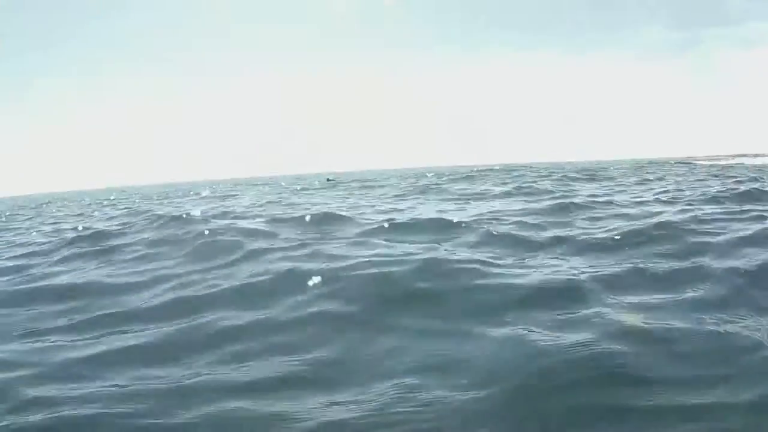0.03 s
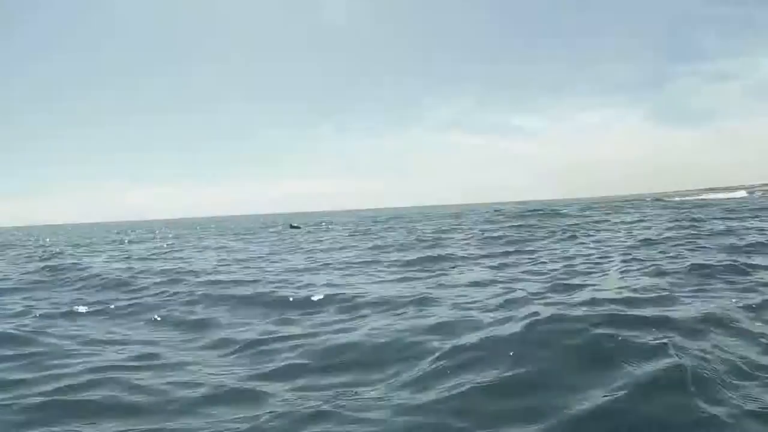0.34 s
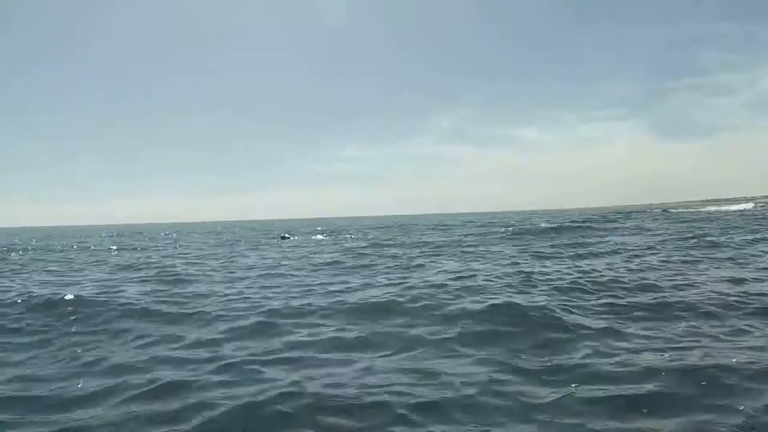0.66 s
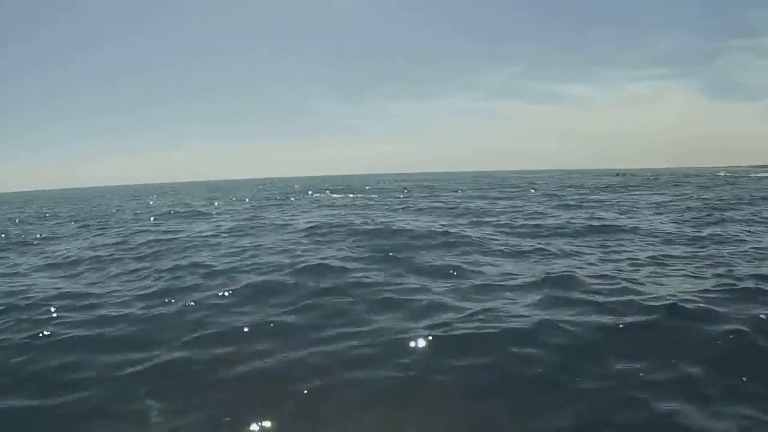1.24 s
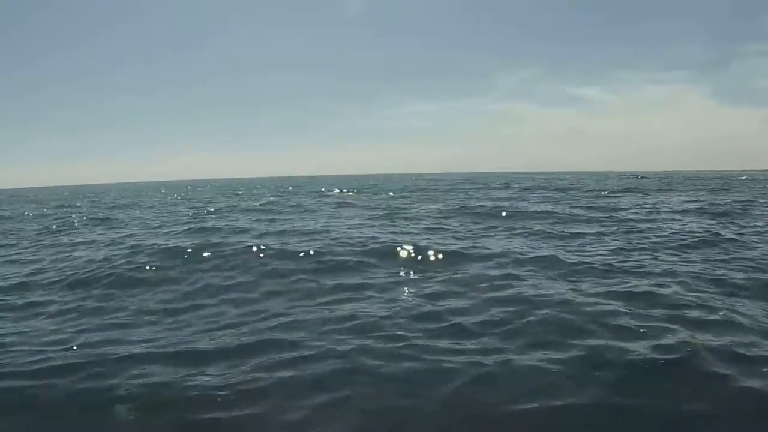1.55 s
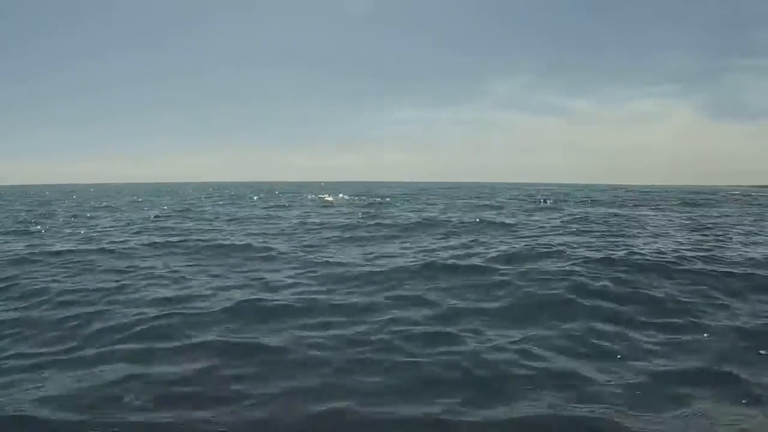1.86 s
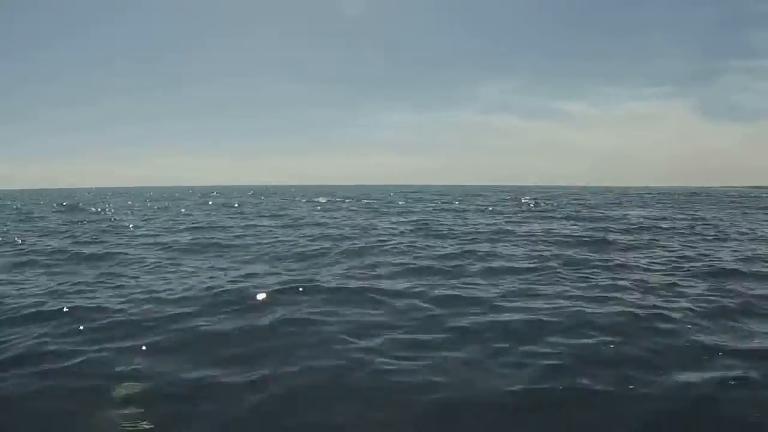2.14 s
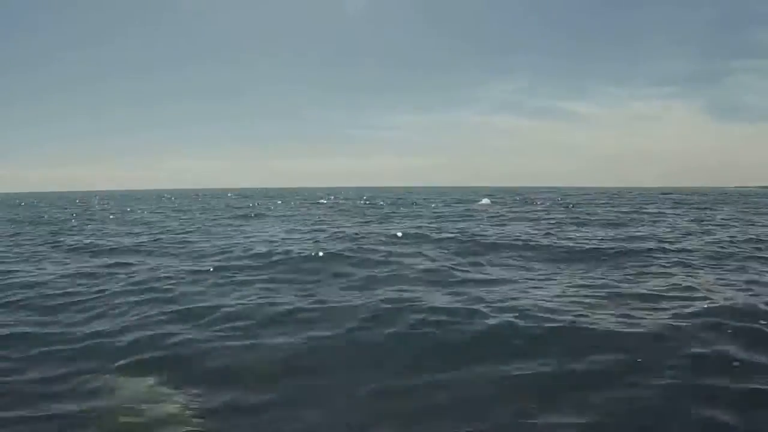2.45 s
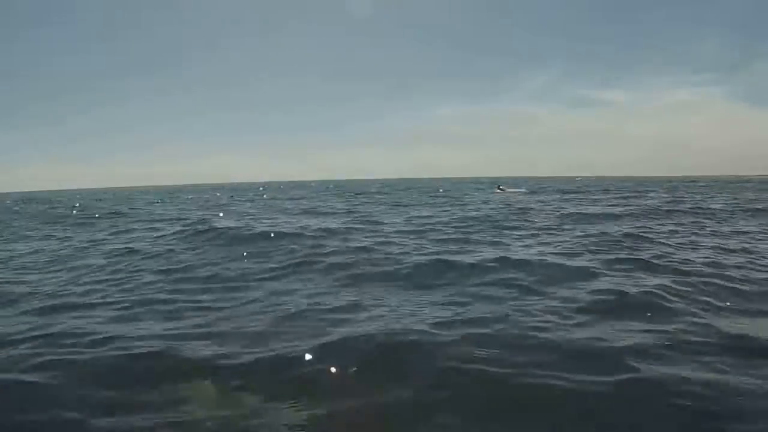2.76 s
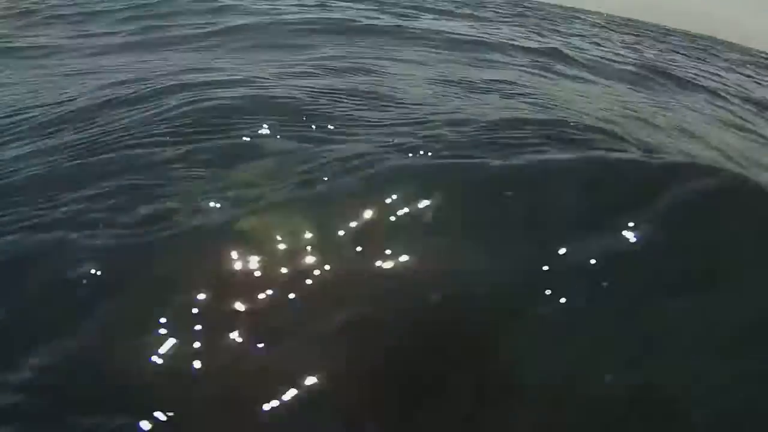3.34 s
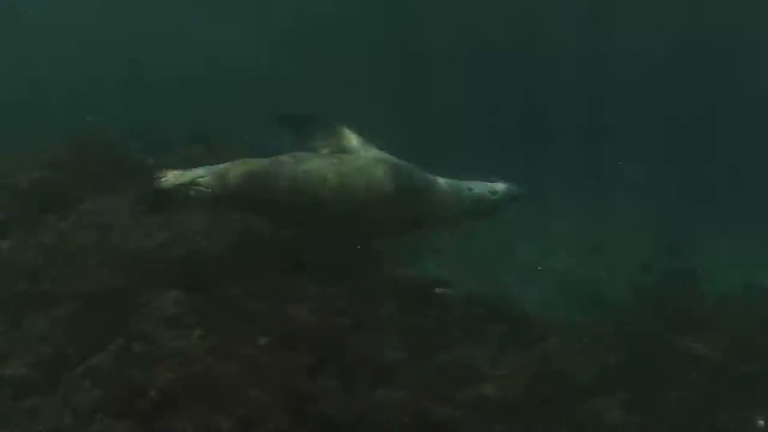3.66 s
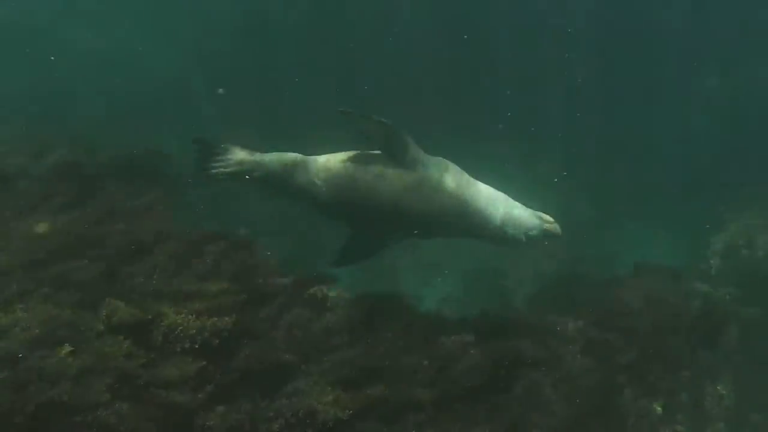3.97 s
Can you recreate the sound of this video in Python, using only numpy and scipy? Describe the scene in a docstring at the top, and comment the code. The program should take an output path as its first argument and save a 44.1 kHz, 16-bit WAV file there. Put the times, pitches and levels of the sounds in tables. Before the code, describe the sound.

Sea water laps and drips close by, then splashes and gurgles as the microphone goes under.

```python
"""A floating case dips under the sea

Wavelets knock a watertight case while droplets and small bubbles plink nearby. From about 3.1 s it
dips under: water slaps the wall and trapped air rings loudly beside it. Each bubble is a damped
oscillator, with the air as its spring and the surrounding water as its mass. Once the case is
submerged, a dull gurgle and a faint fizz remain over the low sway of the water."""
import sys
import numpy as np
from scipy import signal
from scipy.fft import rfft, irfft, next_fast_len
from scipy.io import wavfile
from scipy.ndimage import uniform_filter1d, minimum_filter1d

SR = 44100
rng = np.random.default_rng(int(sys.argv[2]) if len(sys.argv) > 2 else 0)


def persist_wave(psi):
    """Save psi, clipped to +-1, as 16-bit WAV."""
    counts = np.round(np.clip(psi, -1, 1) * 32767).astype(np.int16)
    wavfile.write(sys.argv[1], SR, np.atleast_2d(counts).T)


N = 176400
TIME_S = np.arange(N) / SR
RISE_CYCLES = 1.13  # a small bubble swells over this many cycles


def amp(db):
    """Amplitude ratio of a level in decibels."""
    return 10 ** (np.asarray(db) / 20)


def unit(x):
    """Normalisation to an RMS of one."""
    return x / np.sqrt(np.mean(x ** 2) + 1e-20)


def add(mix, start_s, sound):
    """Superposition: a sound sums into the mix from its start time."""
    part = mix[max(0, round(start_s * SR)):][:len(sound)]
    part += sound[:len(part)]


def level(points, column=1):
    """Gain envelope, interpolated in decibels between points in time."""
    curve = np.array(points)
    return amp(np.interp(TIME_S, curve[:, 0], curve[:, column]))


def decay(t, t60_s):
    """Exponential damping: the amplitude falls 60 dB in t60_s."""
    return np.exp(-np.log(1000) * t / t60_s)


def colour(x, spectrum, tilt_db_per_octave=0, tilt_band_hz=(1050, 9240)):
    """Minimum-phase filtering by a spectrum, tilted across one band."""
    size = next_fast_len(len(x) + 2048) * 2
    octave = np.log2(np.fft.rfftfreq(size, 1 / SR) + 1)
    hz, db = np.transpose(spectrum)
    low, high = np.log2(tilt_band_hz)
    tilt_db = tilt_db_per_octave * (np.clip(octave, low, high) - low)
    cepstrum = irfft(np.log(amp(np.interp(octave, np.log2(hz), db) + tilt_db)))
    cepstrum[1:size // 2] *= 2  # folding the cepstrum makes the filter causal
    cepstrum[size // 2 + 1:] = 0
    return irfft(rfft(x, size) * np.exp(rfft(cepstrum)))[:len(x)]


def drift(hz):
    """Random modulation: low-passed noise with an RMS of one."""
    lowpass = np.exp(-(np.fft.rfftfreq(N, 1 / SR) / hz) ** 2)
    return unit(irfft(rfft(rng.standard_normal(N)) * lowpass, N))


def ring(hz, rise_s, t60_s, glide_per_s=0, max_glide=.09):
    """Damped oscillation, whose pitch may climb by a fraction of up to max_glide."""
    t = np.arange(0, 1.3 * t60_s + 2 * rise_s, 1 / SR)
    envelope = (1 - np.exp(-(t / rise_s) ** 2)) * decay(t, t60_s)
    pitch_hz = hz * (1 + np.minimum(glide_per_s * t, max_glide))
    return envelope / envelope.max() * np.sin(2 * np.pi * np.cumsum(pitch_hz) / SR)


def swarm(per_s, low_hz, high_hz, min_cycles, spread_db, glide_per_s, count=40):
    """Incoherent sum of bubble resonances of many sizes: most are weak, a few stand out."""
    out = np.zeros(N)
    rings = [ring(hz, RISE_CYCLES / hz, min_cycles * rng.uniform(1.0, 2.5) / hz, glide_per_s, .3)
             for hz in np.geomspace(low_hz, high_hz, count)]
    for when, kind, chance, sign in rng.random((int(per_s * N / SR), 4)):
        gain = np.sign(sign - .5) * amp(spread_db * min(-np.log(chance), 3))
        add(out, when * N / SR, gain * rings[int(kind * count)])
    return unit(out)


# air pockets at the case: start_s, pitch_hz, level_db, rise_s, t60_s
TRAPPED_AIR = [(0.0, 1342, -30, 0.00017, 0.087), (0.008, 2470, -23.5, 0.00053, 0.025),
               (0.011, 1644, -32.5, 0.0007, 0.034), (0.043, 2060, -44, 0.00091, 0.08),
               (0.06, 1830, -34, 0.0015, 0.033), (0.0683, 1465, -25, 0.00016, 0.028),
               (0.0735, 1599, -15, 0.00064, 0.058), (0.0741, 2770, -29.5, 0.0005, 0.018),
               (0.151, 8860, -25.5, 0.00036, 0.0082), (0.681, 745, -50, 0.00024, 0.16),
               (1.9244, 1500, -45.5, 0.00027, 0.063), (3.1845, 2510, -5, 0.0011, 0.0025),
               (3.1856, 3860, -10.5, 0.0002, 0.014), (3.1851, 1442, -15, 0.00097, 0.027),
               (3.2703, 1800, -13.5, 0.0004, 0.013), (3.2733, 1945, 0, 0.0011, 0.0055),
               (3.288, 1630, -17.5, 0.0006, 0.043), (3.2876, 1122, -17.5, 0.0015, 0.046),
               (3.3005, 1960, -18.5, 0.0013, 0.024), (3.303, 1220, -15, 0.00077, 0.02),
               (3.3409, 1148, -10.5, 0.0034, 0.02), (3.3428, 1440, -12, 0.0004, 0.012),
               (3.361, 5500, -30, 0.0032, 0.0054), (3.379, 2920, -26, 0.00027, 0.036),
               (3.38, 1700, -23, 0.00028, 0.036), (3.4035, 2286, -16.5, 0.0015, 0.011),
               (3.4395, 2220, -16, 0.00084, 0.006), (3.4395, 9420, -16.5, 0.0006, 0.0047),
               (3.446, 1950, -10.5, 0.00033, 0.005), (3.453, 2320, -16, 0.0014, 0.0061),
               (3.4627, 1830, -10, 0.00031, 0.0013), (3.4705, 1550, -9.5, 0.00033, 0.013),
               (3.4707, 4400, -4.5, 0.00026, 0.0096), (3.4707, 2740, 2, 0.00017, 0.0065),
               (3.4805, 1050, -16.5, 0.00052, 0.0044), (3.502, 2240, -33, 0.0046, 0.028),
               (3.4982, 5740, -11.5, 0.00016, 0.0026), (3.507, 4840, -19, 0.00019, 0.0039),
               (3.5206, 1147, -31, 0.0012, 0.051), (3.5325, 1308, -21, 0.00069, 0.058),
               (3.5394, 1984, -3, 0.00041, 0.019), (3.5395, 6870, -15.5, 0.001, 0.0039),
               (3.5473, 3600, -7, 0.0034, 0.0084), (3.5478, 5450, -15, 0.00035, 0.0055),
               (3.5672, 1395, -14.5, 0.0017, 0.017), (3.5676, 6850, -12.5, 0.00017, 0.0031),
               (3.572, 1885, -17.5, 0.0028, 0.016), (3.585, 4700, -18, 0.00019, 0.008),
               (3.5895, 2690, -15, 0.0021, 0.013), (3.61, 1920, -29, 0.0027, 0.025),
               (3.637, 980, -13.5, 0.001, 0.015), (3.6443, 4390, -22, 0.0016, 0.0076),
               (3.6614, 882, -9.5, 0.00038, 0.045), (3.6642, 1940, -2.5, 0.0026, 0.0072),
               (3.684, 5550, -21, 0.0005, 0.0049), (3.701, 2780, -26, 0.00063, 0.014),
               (3.7154, 2210, -2.5, 0.00069, 0.0034), (3.716, 3830, -21, 0.00024, 0.01),
               (3.7433, 7260, -22, 0.0003, 0.0042), (3.7485, 1044, -30, 0.0008, 0.037),
               (3.9409, 716, -31.5, 0.0016, 0.015), (3.9764, 700, -26, 0.0034, 0.0025),
               (3.9813, 463, -28.5, 0.0024, 0.028)]

def close_bubbles(flutter_db=2.5, glide_per_s=2.8, max_glide=.09):
    """Minnaert resonance: trapped air rings, rising in pitch as it nears the surface."""
    out = np.zeros(N)
    for start_s, hz, db, rise_s, t60_s in TRAPPED_AIR:
        # start flat, to reach the listed pitch near the loudest part
        first_hz = hz / (1 + min(glide_per_s * (rise_s + t60_s / 10), max_glide))
        add(out, start_s, amp(db) * ring(first_hz, rise_s, t60_s, glide_per_s, max_glide))
    return out * amp(flutter_db * drift(hz=418))  # moving water shakes each ring


# water striking the case: start_s, level_db, tilt_db_per_octave, t60_s
WALL_IMPACTS = [(.007, -32.5, 3.5, 0.026), (0.0676, -34.5, 31, 0.0083), (0.073, -26.5, -5.5, 0.035),
                (0.151, -33, 1, 0.0041), (0.805, -41, 7, 0.018), (1.632, -34, 3.5, 0.011),
                (3.0172, -33, -8.5, 0.0069), (3.1198, -35.5, -10.5, 0.082), (3.134, -27.5, 19, 0.0097),
                (3.185, -14.5, 3, 0.019), (3.251, -38, 20, 0.009), (3.257, -28.5, 0.5, 0.029),
                (3.288, -16.5, -2.5, 0.023), (3.306, -26, 21, 0.011), (3.337, -27.5, 13, 0.013),
                (3.343, -18, -2.5, 0.032), (3.438, -17, 11, 0.015), (3.449, -14.5, -7, 0.028),
                (3.462, -19, -3, 0.0095), (3.4708, -7, -2.5, 0.011), (3.481, -26, 5, 0.011),
                (3.493, -23.5, 12.5, 0.0039), (3.498, -11.5, 3, 0.0042), (3.516, -26, 1, 0.0052),
                (3.522, -27, 11, 0.0046), (3.533, -5.5, 14.5, 0.0038), (3.537, -18, 9.5, 0.028),
                (3.553, -33.5, 19, 0.014), (3.567, -11, 9.5, 0.0042), (3.585, -13, -3.5, 0.022),
                (3.651, -38, 13, 0.0093), (3.664, -4, -9, 0.0064), (3.678, -14.5, 34, 0.0066),
                (3.683, -18, -1, 0.016), (3.709, -36, 22, 0.005), (3.7144, -10, -4, 0.0088),
                (3.725, -36, 8, 0.0093), (3.743, -26.5, 5.5, 0.0079), (3.775, -35.5, 16, 0.0073),
                (3.824, -40.5, 5.5, 0.013), (3.833, -40, 9.5, 0.028)]
# spectrum of impacts heard through the wall: frequency_hz, gain_db
WALL_SPECTRUM = [(100, -0.5), (500, -14), (1200, 5.5), (2200, 11), (3200, 1.5), (4100, 3.5), (4900, -9.5),
                 (5800, -2.5), (8000, -14), (10000, -18.5), (13000, -25), (16000, -39)]

def slaps(rise_s=0.0013, gain_db=-1):
    """Impact noise: each slap is a burst of tiny collisions, filtered by the case wall."""
    out, t = np.zeros(N), np.arange(2400) / SR
    for start_s, db, tilt, t60_s in WALL_IMPACTS:
        envelope = (1 - np.exp(-t / rise_s)) * decay(t, t60_s)
        burst = colour(envelope * rng.standard_normal(len(t)), WALL_SPECTRUM, tilt)
        burst *= np.linalg.norm(envelope / envelope.max()) / np.linalg.norm(burst)
        add(out, start_s, amp(db + gain_db) * burst / 2)
    return out


def case_resonance(x, t60_s=0.016, ring_db=-18.5):
    """Convolution with the plastic case's impulse response adds a short, dense ring."""
    t = np.arange(5000) / SR
    burst = rng.standard_normal(len(t)) * (1 - np.exp(-t / 0.0045)) * decay(t, t60_s)
    response = colour(burst, [(300, -5.0), (1200, 8.5), (3500, 10), (12000, -38)])
    return x + signal.fftconvolve(x, amp(ring_db) * response / np.linalg.norm(response))[:N]


# air churned in as the case sinks: time_s, level_db
CHURN_LEVEL = [(3.1, -83), (3.24, -55), (3.39, -41.5), (3.425, -54), (3.56, -38), (3.62, -46), (3.68, -36),
               (3.77, -68)]

def dive(spray_db=-12):
    """Air entrainment: water closing over the case makes churning bubbles and fine spray."""
    churn = swarm(per_s=420, low_hz=850, high_hz=3170, min_cycles=26, spread_db=2, glide_per_s=3.1)
    spray = swarm(per_s=1000, low_hz=3600, high_hz=15000, min_cycles=10, spread_db=6, glide_per_s=4)
    return level(CHURN_LEVEL) * (TIME_S > CHURN_LEVEL[0][0]) * (churn + amp(spray_db) * spray)


# wavelets meeting the case: start_s, level_db, pitch_hz
WAVELET_KNOCKS = [(0.066, -31, 167), (0.52, -34, 157), (0.706, -35, 159.4), (0.807, -33, 152),
                  (0.909, -36.5, 164), (1.037, -36, 154), (1.164, -37.5, 160), (1.383, -38.5, 147),
                  (1.629, -33.5, 144), (2.541, -36.5, 172), (2.835, -33.5, 150), (3.065, -29.5, 174),
                  (3.13, -28.5, 157), (3.183, -22.5, 164), (3.338, -31, 171), (3.402, -28, 214),
                  (3.448, -26.5, 139), (3.474, -24.5, 217)]

def knocks(rise_s=0.0083, t60_s=0.021):
    """Heavy damping: each wavelet's push dies away as a soft thump of a cycle or two."""
    out = np.zeros(N)
    for start_s, db, hz in WAVELET_KNOCKS:
        add(out, start_s, amp(db) * ring(hz, rise_s, t60_s))
    return out


# droplets landing nearby: start_s, level_db, pitch_hz
DROPLETS = [(0.292, -35.5, 2750), (0.327, -38.5, 3520), (0.3974, -39, 5770), (0.422, -42, 1800),
            (0.506, -37, 4200), (0.5492, -45.5, 2750), (0.6797, -45.5, 4030), (0.8071, -39, 3700),
            (0.857, -43, 9100), (1.032, -44, 5950), (1.284, -40, 6500), (1.403, -41, 2510),
            (1.527, -41, 4560), (1.5533, -41.5, 3380), (1.7768, -41.5, 5740), (2.2, -39, 6000),
            (2.4625, -38.5, 1880), (2.729, -36.5, 2100)]

def drops(cycles=16, main_db=-2, satellite_db=-9, scatter_s=0.015, satellites=4):
    """Entrainment by impact: a droplet traps one ringing bubble, then weaker ones of other sizes."""
    out = np.zeros(N)
    for start_s, db, hz in DROPLETS:
        add(out, start_s, amp(db + main_db) * ring(hz, RISE_CYCLES / hz, cycles / hz))
        for lag, octave in rng.random((satellites, 2)):
            satellite_hz = hz * 2 ** (octave - .5)
            plink = ring(satellite_hz, RISE_CYCLES / satellite_hz, cycles / satellite_hz)
            add(out, start_s + scatter_s * lag, amp(db + satellite_db) * plink)
    return out


# bubbles surfacing beside the case: start_s, level_db, first_hz, last_hz, length_s
SURFACING_BUBBLES = [(1.076, -46, 1410, 2500, 0.02), (2.023, -42, 2180, 3680, 0.0129),
                     (2.849, -47, 1330, 2420, 0.0143), (3.032, -44, 1680, 3070, 0.02)]

def chirps(waver=0.087):
    """Falling mass load: a bubble's resonance sweeps upward, unevenly, as it reaches the surface."""
    out = np.zeros(N)
    shake, wobble = drift(hz=260), drift(hz=202)
    for start_s, db, first_hz, last_hz, length_s in SURFACING_BUBBLES:
        progress = np.linspace(0, 1, round(length_s * SR))
        span = round(start_s * SR) + np.arange(len(progress))
        hz = first_hz * (last_hz / first_hz) ** (progress ** 1.18) * (1 + waver * wobble[span])
        envelope = np.sin(np.pi * progress) * (1 + shake[span])
        add(out, start_s, amp(db) * envelope * np.sin(2 * np.pi * np.cumsum(hz) / SR))
    return out


# small hard parts of the case: start_s, pitch_hz, level_db, t60_s
FITTING_MODES = [(3.185, 5700, -41, 0.1), (3.307, 9500, -51, 0.051)]

def fittings():
    """Free vibration: after a slap, each fitting rings on at its natural frequency."""
    out = np.zeros(N)
    for start_s, hz, db, t60_s in FITTING_MODES:
        add(out, start_s, amp(db) * ring(hz, RISE_CYCLES / hz, t60_s))
    return out


# gurgle below the surface: time_s, level_db
GURGLE_LEVEL = [(3.45, -64), (3.6, -53), (3.77, -62.5), (3.81, -40), (3.87, -51.5), (3.97, -50)]

def under_water(fizz_db=-62, submerged_s=3.75):
    """Resonant pitch varies inversely with radius: large bubbles gurgle and fine ones fizz."""
    gurgle = swarm(per_s=550, low_hz=420, high_hz=760, min_cycles=7, spread_db=1, glide_per_s=2)
    gurgle *= level(GURGLE_LEVEL) * (TIME_S > GURGLE_LEVEL[0][0])
    fizz = swarm(per_s=2000, low_hz=2300, high_hz=14000, min_cycles=10, spread_db=4, glide_per_s=0)
    fizz *= unit(amp(4 * drift(hz=50)))
    return gurgle + amp(fizz_db) * (TIME_S > submerged_s) * fizz


# water pushing on the case: time_s, rumble_level_db, slosh_level_db
SWAY_LEVELS = [(0, -44, -49), (.1, -43, -51.5), (.3, -48, -52.5), (.6, -46.5, -55), (.72, -45.5, -45),
               (.82, -62, -60), (.89, -36, -56), (1, -50.5, -52.5), (2.3, -52, -57), (2.56, -43, -43.5),
               (2.72, -56, -54), (3.15, -37, -51), (3.44, -36.5, -40.5), (3.6, -56.5, -45.5),
               (3.88, -46.5, -56)]
# spectra of the deep rumble and of the slosh above it: frequency_hz, gain_db
RUMBLE_SPECTRUM = [(10, -3.5), (22, -2.5), (48, -3), (80, -9), (130, -18), (300, -67)]
SLOSH_SPECTRUM = [(50, -24.5), (100, -3), (150, 1), (210, -2), (290, -19), (420, -27), (900, -72)]

def sway(rumble_db=-1, slosh_db=-3, rumble_lump_db=-2.0, slosh_lump_db=3.5):
    """Pressure fluctuation: water moving round the case makes lumpy, low noise."""
    rumble = colour(rng.standard_normal(N), RUMBLE_SPECTRUM) * amp(rumble_lump_db * drift(hz=10.3))
    slosh = colour(rng.standard_normal(N) * amp(slosh_lump_db * drift(hz=23.5)), SLOSH_SPECTRUM)
    return (amp(rumble_db) * unit(rumble) * level(SWAY_LEVELS)
            + amp(slosh_db) * unit(slosh) * level(SWAY_LEVELS, column=2))


def swish(start_s=0.893, length_s=0.097, level_db=-59.5):
    """Flow noise, filtered by the wall, swells and fades as one wavelet runs along the case."""
    progress = np.clip((TIME_S - start_s) / length_s, 0, 1)
    return amp(level_db) * np.sin(np.pi * progress) * unit(colour(rng.standard_normal(N), WALL_SPECTRUM))


# spectrum of the open sea's wash: frequency_hz, gain_db
WASH_SPECTRUM = [(100, -0.5), (300, 4.5), (500, 2.5), (900, 1.5), (1250, -1.5), (1600, 0.5), (2200, -5.5),
                 (4000, -8.5), (6000, -14.5), (9000, -15), (11000, -17.5), (12300, -18), (14700, -23),
                 (16000, -31)]
# the distant wash and the trickle on the ripples: time_s, level_db
WASH_LEVEL = [(0, -53.5), (.15, -60.5), (3.8, -61.5)]
TRICKLE_LEVEL = [(.1, -60), (.5, -57.5), (.8, -63), (1.5, -63.5), (2.6, -64.5), (3.2, -56), (3.75, -88)]

def sea(hiss_db=-1.5, plink_db=-3, fizz_db=-10, patch_db=1):
    """Ambient noise: a broadband distant wash, with clumps of small bubbles ringing on the ripples."""
    hiss = unit(colour(rng.standard_normal(N), WASH_SPECTRUM)) * amp(patch_db * drift(hz=60))
    clumps = unit(amp(3.5 * drift(hz=16)))
    plinks = swarm(per_s=500, low_hz=1200, high_hz=3900, min_cycles=14, spread_db=4.5, glide_per_s=6)
    fizz = swarm(per_s=350, low_hz=4600, high_hz=7800, min_cycles=13, spread_db=5, glide_per_s=6)
    trickle = clumps * (amp(plink_db) * plinks + amp(fizz_db) * fizz)
    return level(WASH_LEVEL) * amp(hiss_db) * hiss + level(TRICKLE_LEVEL) * trickle


def scene():
    """Superposition in one channel: near sounds ring the case; knocks, sway and sea add directly."""
    near = close_bubbles() + chirps() + drops() + slaps() + fittings() + swish() + dive() + under_water()
    return (case_resonance(near) + knocks() + sway() + sea())[None]


def record(dry, ceiling=.95, cutoff_hz=15800):
    """Peak limiting: the gain dips briefly at the loudest peaks, then a low-pass limits the band."""
    safe_gain = np.minimum(1, ceiling / (abs(dry) + 1e-9))
    smooth_gain = uniform_filter1d(minimum_filter1d(safe_gain, size=129), size=129)
    lowpass = signal.firwin(255, cutoff_hz, window=("kaiser", 9), fs=SR)
    return signal.oaconvolve(dry * smooth_gain, lowpass[None], "same")


dry = scene()
out = record(dry)
persist_wave(out)
```